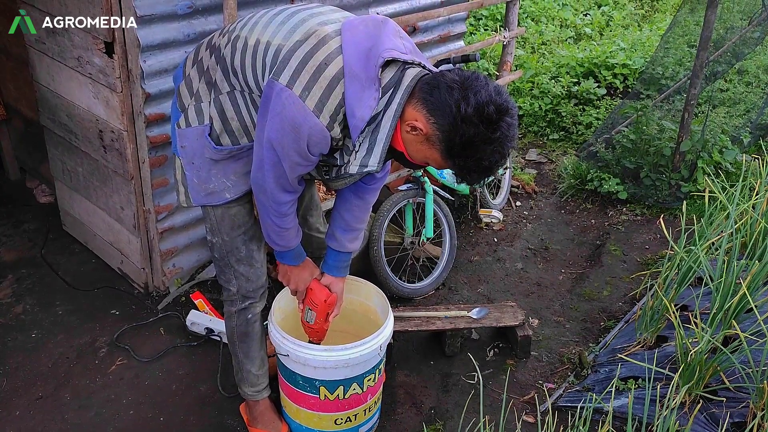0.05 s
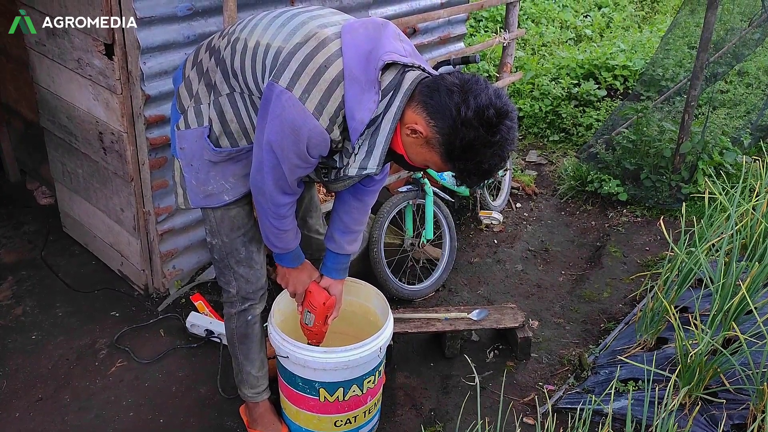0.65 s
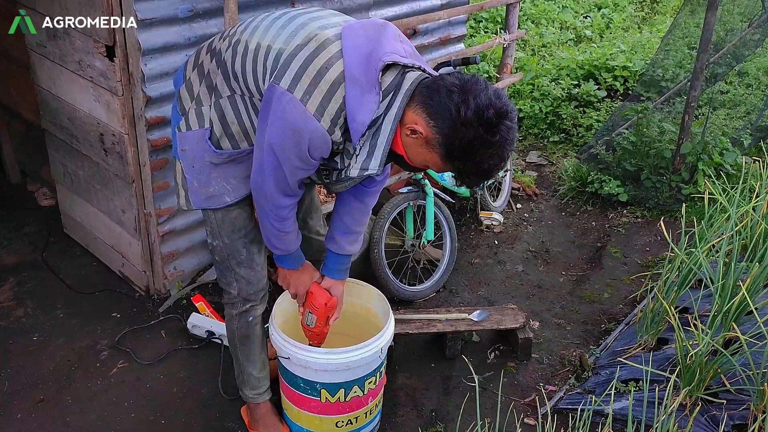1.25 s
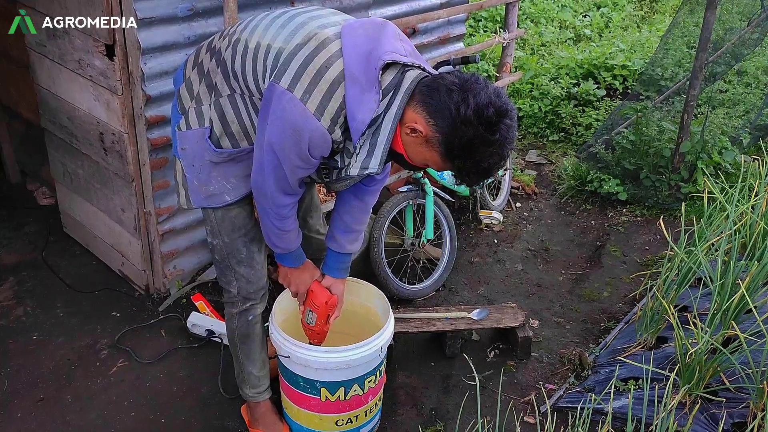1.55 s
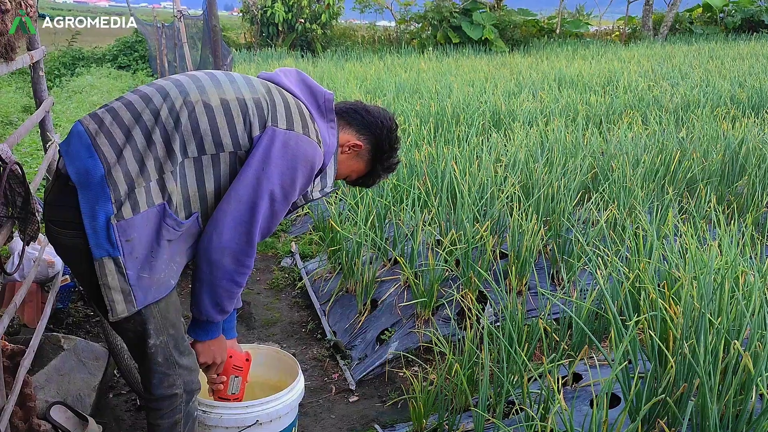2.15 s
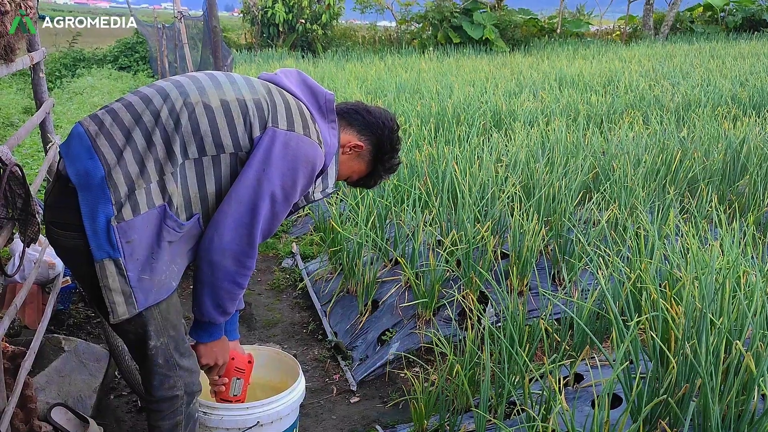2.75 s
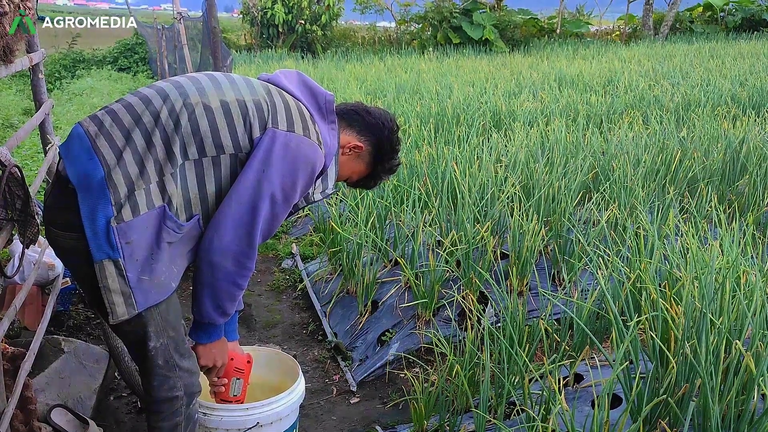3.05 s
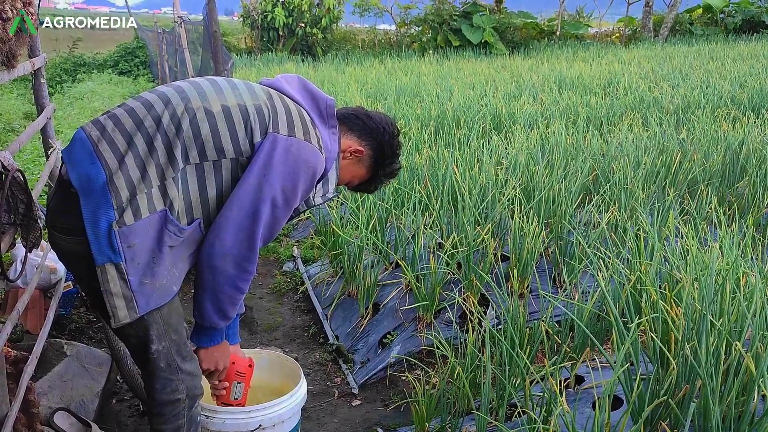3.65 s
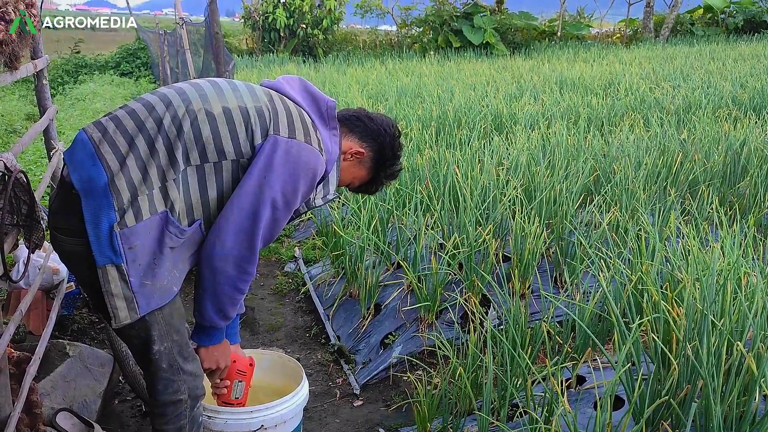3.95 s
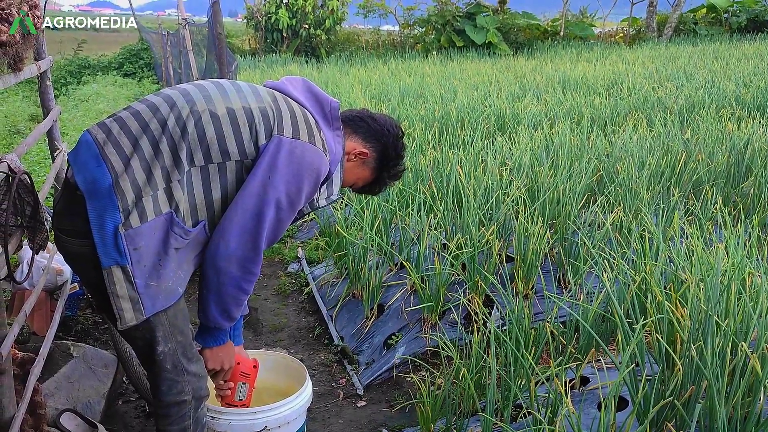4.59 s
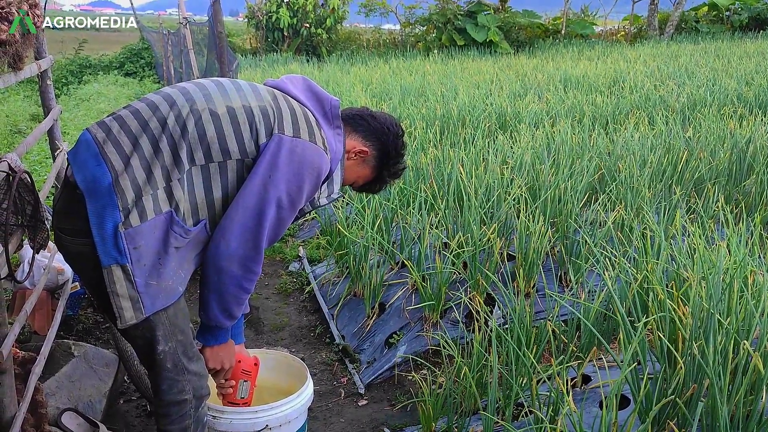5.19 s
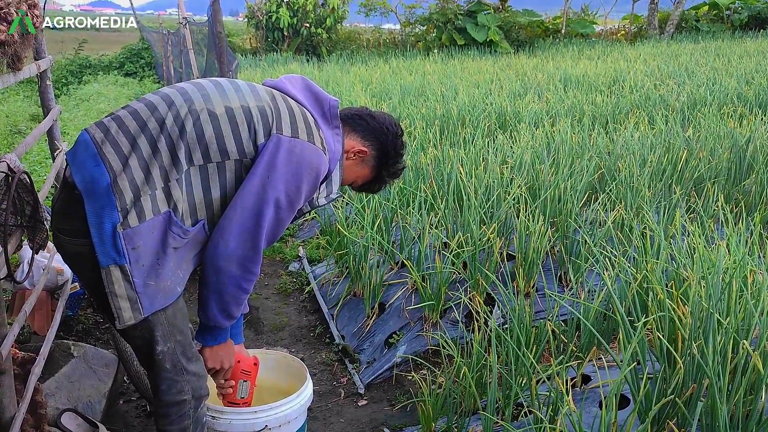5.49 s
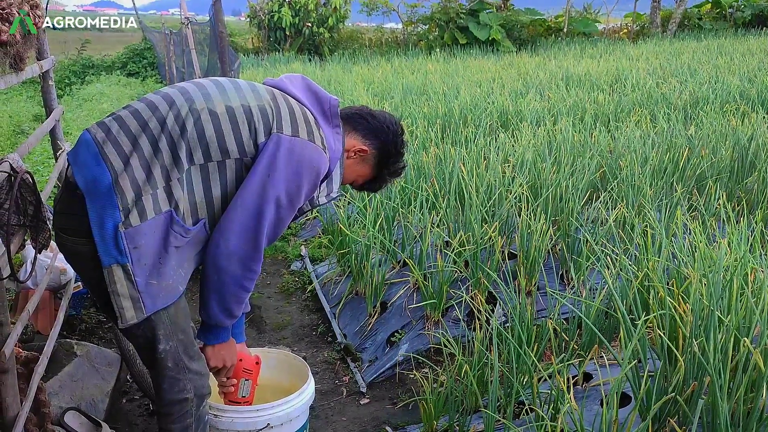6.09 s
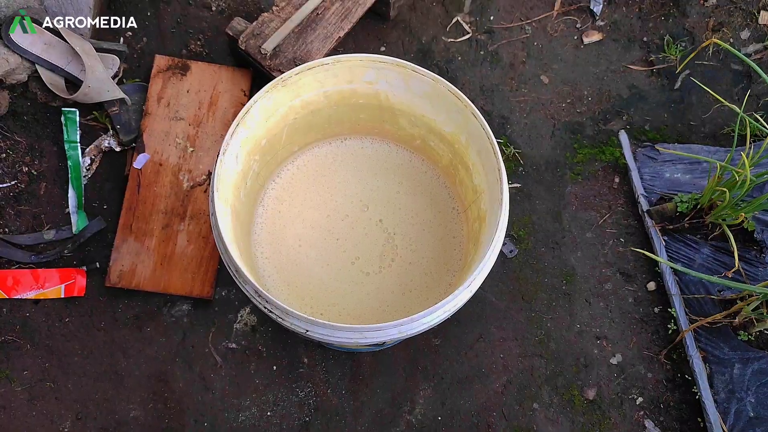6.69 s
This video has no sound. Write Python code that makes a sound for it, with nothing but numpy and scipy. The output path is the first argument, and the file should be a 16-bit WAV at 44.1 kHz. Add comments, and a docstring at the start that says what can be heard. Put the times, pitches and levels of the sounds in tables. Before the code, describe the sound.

Outdoors, an electric drill stirs liquid in a plastic bucket with a steady whine, rattling gears and soft paddle slaps, as wind buffets the microphone. The sound dips for an instant and returns from another angle, the speed drifting up and down while the bucket drones. Then the drill stops abruptly, and only rustling cloth, light wind and a distant hum with a few soft throbs remain.

```python
"""A corded drill whines and rattles close by, its paddle slapping thick liquid in a plastic bucket.
Gear teeth click and ring the case on every turn, brushes and fan hiss, the rod makes the bucket drone,
and gusts rumble on the microphone. From 1.85 s the drill is heard from the side,
its speed sagging and recovering with the drag. At 6.4 s it is gone, leaving a rustle of clothes
and a far hum with a few soft low throbs."""
import sys
import numpy as np
from scipy import signal
from scipy.fft import rfft, irfft, next_fast_len
from scipy.io import wavfile

SR = 44100
rng = np.random.default_rng(int(sys.argv[2]) if len(sys.argv) > 2 else 0)


def int16_out(signal):
    """Quantize to a 16-bit WAV file."""
    q = np.round(np.clip(np.atleast_2d(signal).T, -1, 1) * 32767)
    wavfile.write(sys.argv[1], SR, q.astype(np.int16))


N = 301195
TIME = np.arange(N) / SR
FREQS = np.maximum(np.arange(N // 2 + 1) * SR / N, 1)

GEAR_TEETH, PINION_TEETH = 47, 6
STEADY_SPEED_HZ = 36.985  # spindle turns per second under even drag
# when each place is heard: start_s, fade_in_s, end_s
NEAR_SPAN, FAR_SPAN, AFTER_SPAN = (-0.01, 0.002, 1.820), (1.852, 0.27, 6.357), (6.395, 0.52, 7.5)
# balance of the drill: rattle_db, whine_db, ring_db, motor_db
NEAR_MIX, FAR_MIX = (-29, 3, 0, -0.5), (-31, 2, -1.5, -2.5)
# spindle speeds at which the gear case sings: centre_hz, half_width_hz
SINGING, LOW_SINGING = (37.6, 0.95), (36.55, .2)

# spindle speed under changing drag: time_s, speed_hz
FAR_SPINDLE_SPEED = [(1.86, 37.313), (2.065, 36.659), (2.417, 36.432), (2.779, 37.403), (3.462, 38.243),
                     (4.369, 38.406), (4.813, 38.258), (5.211, 36.549), (5.603, 35.822), (6.104, 35.539),
                     (6.36, 37.176)]
# gear whine, clustered round the tooth rate: spindle_multiple, level_db
NEAR_MESH_TONES = [(46, -38), (47, -44.5), (48, -40.5), (50, -47.5), (51, -45.5), (52, -49), (57, -51)]
FAR_MESH_TONES = [(46, -48), (47, -38), (48, -53), (52, -53), (53, -55), (55, -56), (56, -53)]
# tight spots of the gear, slack where negative: place_turns, width_turns, load_db
NEAR_TIGHT_SPOTS = [(.11, 0.085, 10), (.375, 0.027, 11), (.59, 0.06, 6), (0.88, 0.049, 3)]
FAR_TIGHT_SPOTS = [(.09, 0.031, -1), (.265, 0.021, 9), (.48, 0.074, 6.5), (.67, 0.03, 1.5),
                   (0.88, 0.035, -4)]
# how deeply each band pulses with the load, the steady fan masking the rest: low_hz, high_hz, depth_ratio
PULSING_BANDS = [(30, 1600, .45), (1600, 2800, .85), (2800, 4200, .8), (4200, 16000, .6)]
# spectrum of the rattle: frequency_hz, gain_db
NEAR_RATTLE_SPECTRUM = [(90, -26.5), (180, -17), (260, -2), (450, -8), (700, -0.5), (1100, 1.5), (2000, -2),
                        (3400, 4.5), (5000, -5.5), (7000, -11.5), (10000, -20.5), (12000, -28.5),
                        (14000, -29)]
FAR_RATTLE_SPECTRUM = [(90, -14.5), (180, -17), (300, -9.5), (450, -10.5), (700, -4), (1100, -1.5),
                       (2000, -2.5), (2800, -3.5), (3400, -0.5), (4200, -4.5), (5000, -11), (7000, -18.5),
                       (10000, -24.5), (12000, -33), (14000, -35)]
# stereo width of the rattle: frequency_hz, side_minus_mid_db
SIDE_SPECTRUM = [(100, -72.5), (3850, -67.5), (4200, -50), (5000, -53), (5800, -28), (7000, -13.5),
                 (8500, -6), (14000, -6.5)]
# peaks and dips of housing and bucket: centre_hz, width_hz, gain_db
NEAR_RESONANCES = [(723.5, 42, 8.5), (912, 100, -5), (1090, 320, 6.5), (1794, 320, 5), (2750, 230, -3.5),
                   (3770, 550, 3.5), (4720, 580, 3.5), (5460, 400, -6), (8750, 240, 7.5)]
FAR_RESONANCES = [(394, 70, -6), (748, 82, 4.5), (999, 93, 5.5), (1500, 160, 4), (1670, 180, -3),
                  (2025, 36, 7.5), (2577, 95, 5), (2740, 110, -2), (3090, 240, 4.5), (3720, 195, 1),
                  (4520, 140, 0), (5150, 100, 7), (6010, 103, 6.5), (6555, 350, -6.5), (6734, 330, 11)]
# resonances that shift in strength with spindle speed: centre_hz, width_hz, gain_db, rise_db_per_hz
SHIFTING_RESONANCES = [(2014, 90, 0.5, -0.9), (3100, 260, -0.5, -0.9), (4050, 450, 0, 1.0),
                       (6000, 260, -1, 1.4), (6900, 200, 0.5, -0.8), (9400, 900, 1, 0.4),
                       (10900, 450, 2, 1.0)]
# ringing knocks of worn teeth: place_turns, spindle_multiple, width_s, peak_db
NEAR_WORN_TEETH = [(.1112, 94.4, .0015, -22.7), (.3696, 93.2, .002, -22.3), (.506, 94.2, .0006, -20.5),
                   (.5837, 95.1, .002, -20.8), (.8771, 95.5, .002, -27)]
FAR_WORN_TEETH = [(.0886, 91, .0012, -32), (.2471, 96, .0007, -29), (.4918, 94, .0007, -28),
                  (.6719, 93, .0007, -22.5)]
SINGING_TOOTH = [(.4812, 94.3, .0023, -26)]
LOW_SINGING_TOOTH = [(.5, 85.5, .002, -29)]
# armature and fan tones: motor_multiple, level_db
NEAR_MOTOR_TONES = [(3, -47.5), (4, -46.5), (5, -48.5), (11, -49.5), (16, -45.5), (24, -55.5)]
FAR_MOTOR_TONES = [(3, -56), (4, -46), (5, -55), (7, -56), (11, -53)]
# wobble of the stirring rod: spindle_multiple, level_db
NEAR_ROD_TONES = [(2, -59), (3, -61), (4, -55), (6, -58), (7, -61), (8, -60)]
FAR_ROD_TONES = [(2, -58), (3, -56), (5, -65), (6, -64), (7, -69.5), (8, -68), (9, -67), (10, -68.5)]
# the rod bears on the bucket: start_s, end_s, low_tones_db, high_tones_db
ROD_LEANS = [(0.32, 1.9, 0.5, 2), (2.099, 3, -4, 0), (3.05, 4.1, -4, -10), (3.5, 5.1, -1, 9.5),
             (5.15, 5.55, 2, 5.5), (5.949, 6.24, 2.5, -1)]
# dull scrape of the rod on the wall: frequency_hz, gain_db
SCRAPE_SPECTRUM = [(50, -7.5), (140, 10.5), (220, -11), (500, -18)]
# runs of paddle slaps, heard only within NEAR_SPAN: first_s, last_s, last_level_db
PADDLE_RUNS = [(.135, 0.45, -32), (.515, 0.56, -33), (.677, 0.93, -31), (1.19, 1.21, -34.5),
               (1.271, 1.4, -34.5), (1.488, 1.73, -38.5), (1.757, 2.5, -19.5)]
# gusts: peak_s, half_length_s, rise_db
WIND_GUSTS = [(0.17, 0.12, 2), (0.41, 0.14, 9), (0.732, 0.099, 4), (1.65, 0.17, 6.5), (5.235, 0.11, 6)]
# spectra of wind, of cloth and air, and of swish and ticks: frequency_hz, gain_db
WIND_SPECTRUM = [(5, 7), (12, -0.5), (22, -6), (35, -15), (60, -29.5), (120, -40), (300, -45), (1000, -100)]
RUSTLE_SPECTRUM = [(60, 18), (250, 13.5), (500, 4.5), (1100, 3), (2000, 0), (3500, -3), (6000, -7.5),
                   (10000, -11), (14000, -18)]
CRISP_SPECTRUM = [(400, -15), (1500, -3), (3200, 3), (12000, -22)]
# small dry ticks: start_s, level_db
DRY_TICKS = [(6.464, -68), (6.589, -67), (6.607, -67), (6.823, -69)]
# partials of the far hum: pitch_hz, level_db
HUM_PARTIALS = [(177.6, -69), (204.6, -71), (689, -85), (1061, -82)]
# soft low throbs in the far hum: start_s, level_db, nominal_pitch_hz
HUM_THROBS = [(6.608, -56, 130), (6.709, -56, 200), (6.779, -41, 129)]


def drill_near(turns, speed):
    """Superposition at close range: strong ringing bursts from the gear case, with bucket and liquid."""
    rattle = housing_rattle(turns, NEAR_TIGHT_SPOTS, NEAR_RATTLE_SPECTRUM, NEAR_RESONANCES)
    whine = gear_whine(turns - NEAR_TIGHT_SPOTS[0][0], NEAR_MESH_TONES, backlash_teeth=.04)
    ring = case_ring(turns, speed, NEAR_WORN_TEETH, jitter_s=.00001)
    motor = motor_tones(turns, NEAR_MOTOR_TONES)
    machine = drill(NEAR_MIX, speed, rattle, whine, ring, motor, flutter_db=0.6)
    return machine + bucket_drone(turns, NEAR_ROD_TONES) + paddle_slaps()


def drill_far(turns, speed):
    """Resonance heard from the side: the gear ticks, and near its singing speeds one spot rings out."""
    rattle = housing_rattle(turns, FAR_TIGHT_SPOTS, FAR_RATTLE_SPECTRUM, FAR_RESONANCES)
    rattle = shifting_resonances(rattle, speed)
    whine = gear_whine(turns - SINGING_TOOTH[0][0], FAR_MESH_TONES, backlash_teeth=.025)
    whine = colour(whine, [(1, 0)], FAR_RESONANCES)
    ring = case_ring(turns, speed, FAR_WORN_TEETH, jitter_s=.000025)
    ring += case_response(speed, *SINGING) * case_ring(turns, speed, SINGING_TOOTH, jitter_s=.00001)
    ring += case_response(speed, *LOW_SINGING) * case_ring(turns, speed, LOW_SINGING_TOOTH, .00003)
    motor = motor_tones(turns, FAR_MOTOR_TONES)
    machine = drill(FAR_MIX, speed, rattle, whine, ring, motor, flutter_db=0.55)
    return machine + bucket_drone(turns, FAR_ROD_TONES)


def drill(mix, speed, rattle, whine, ring, motor, flutter_db):
    """Amplitude modulation: levels follow the speed, and the gear flutters as liquid tosses the rod."""
    rattle_db, whine_db, ring_db, motor_db = mix
    excess_hz = speed - STEADY_SPEED_HZ
    gear = from_db(rattle_db + 0.17 * excess_hz) * rattle
    gear += case_response(speed, *SINGING) * from_db(whine_db) * whine + from_db(ring_db) * ring
    flutter = rms_one(from_db(flutter_db * drift(66)))
    return flutter * gear + from_db(motor_db + 2.5 * excess_hz) * motor


def tooth_rattle(turns, spots, wear=0.71, spread_db=1.5, hiss_db=2.5):
    """Impact noise: each tooth clicks, partly alike on every turn, amid the hiss of brushes and fan."""
    tooth = np.floor(turns * GEAR_TEETH).astype(int)
    impacts = np.flatnonzero(np.diff(tooth)) + 1
    flaws = rng.standard_normal(GEAR_TEETH)[tooth[impacts] % GEAR_TEETH]
    chance = rms_one(rng.choice([-1, 1], N) * from_db(spread_db * rng.uniform(-0.39, 1, N)))
    clicks = np.zeros(N)
    clicks[impacts] = chance[impacts] + wear * flaws
    for lag in (13, 37, 59):  # each click scatters through the gear case for a few ms
        allpass = np.r_[-.6, np.zeros(lag), 1]
        clicks = signal.lfilter(allpass, allpass[::-1], clicks)
    rasp = rms_one(clicks) + from_db(hiss_db) * rng.standard_normal(N)
    load_db, out = tooth_load(turns, spots), 0
    for low_hz, high_hz, depth in PULSING_BANDS:
        band = shaped(rasp, (FREQS >= low_hz) & (FREQS < high_hz))
        out += band * rms_one(from_db(depth * load_db))
    return out


def tooth_load(turns, spots):
    """Periodic loading: the force on the teeth, in dB, swells at each tight spot of the gear."""
    load_db = 0
    for place, width, db in spots:
        offset = (turns - place + .5) % 1 - .5
        load_db += db * np.exp(-.5 * (offset / width) ** 2)
    return load_db


def housing_rattle(turns, spots, spectrum, resonances):
    """Source and filter: the housing colours the rattle; the two channels differ only in the treble."""
    mid, side = [rms_one(colour(tooth_rattle(turns, spots), spectrum, resonances)) for _ in range(2)]
    return mid + colour(side, SIDE_SPECTRUM) * [[1], [-1]]


def shifting_resonances(rattle, speed, grip_db=0.9, flicker_db=2.0):
    """Time-varying filter: housing resonances come and go with speed and grip, and flicker grittily."""
    out = rattle
    for hz, width, db, rise in SHIFTING_RESONANCES:
        bell = np.exp(-2 * ((FREQS - hz) / width) ** 2)
        band = np.array([shaped(channel, bell) for channel in rattle])
        gain_db = db + rise * (speed - STEADY_SPEED_HZ) + grip_db * drift(3.1) + flicker_db * drift(100)
        out = out + (from_db(gain_db) - 1) * band
    return out


def gear_whine(turns, mesh, backlash_teeth):
    """Phase modulation: backlash roughens the tones clustered round the tooth rate."""
    play_turns = backlash_teeth * drift(60) / GEAR_TEETH
    return shaft_tones(turns + play_turns, mesh, scatter=0.71, waver_db=0.8)


def case_ring(turns, speed, teeth, jitter_s, scatter_db=1.6):
    """Impact excitation: each worn tooth rings the case once a turn, at a pitch that follows speed."""
    out = np.zeros(N)
    for place, multiple, width_s, db in teeth:
        turn = np.floor(turns - place + .5)
        chance_per_turn = rng.standard_normal((int(turn[-1]) + 3, 2))
        strength, lateness = chance_per_turn[turn.astype(int) + 1].T
        age = (turns - place - turn) / speed - jitter_s * lateness
        burst = from_db(db + scatter_db * strength) * np.exp(-.5 * (age / width_s) ** 2)
        out += burst * np.sin(2 * np.pi * multiple * speed * age)
    return out


def case_response(speed, centre_hz, half_width_hz):
    """Resonance curve, 0 to 1: the gear case answers most strongly at one speed."""
    return 1 / (1 + ((speed - centre_hz) / half_width_hz) ** 2)


def motor_tones(turns, harmonics):
    """Gear reduction: armature and fan spin faster than the spindle by the ratio of the teeth."""
    return shaft_tones(turns * GEAR_TEETH / PINION_TEETH, harmonics, scatter=0.8, waver_db=1.4)


def shaft_tones(turns, harmonics, scatter, waver_db):
    """Interference: harmonics of a shaft, if little scattered in phase, add up to a beat each turn."""
    out = np.zeros(N)
    for multiple, db in harmonics:
        phase = 2 * np.pi * round(multiple) * turns + scatter * rng.uniform(-np.pi, np.pi)
        out += from_db(db + waver_db * drift(4.6)) * np.sqrt(2) * np.cos(phase)
    return out


def bucket_drone(turns, harmonics, attack_s=0.078, release_s=0.16, ease_db_per_s=2.5):
    """Forced vibration: the off-centre rod shakes and scrapes the bucket as it leans on the wall."""
    hum_gain = low_gain = high_gain = from_db(-35)  # the rod runs free
    for start, end, low_db, high_db in ROD_LEANS:
        contact = np.clip(np.minimum((TIME - start) / attack_s, 1 - (TIME - end) / release_s), 0, 1)
        pressure = contact * from_db(-ease_db_per_s * (TIME - start))
        hum_gain = np.maximum(hum_gain, contact)  # the twice-a-turn hum needs only contact
        low_gain = np.maximum(low_gain, from_db(low_db) * pressure)
        high_gain = np.maximum(high_gain, from_db(high_db) * pressure)
    hum = shaft_tones(turns, harmonics[:1], scatter=0.26, waver_db=2.0)
    low = shaft_tones(turns, [row for row in harmonics[1:] if row[0] <= 4], scatter=0.387, waver_db=2.0)
    high = shaft_tones(turns, [row for row in harmonics if row[0] > 4], scatter=0.66, waver_db=2.5)
    scrape = from_db(-59) * noise(SCRAPE_SPECTRUM)
    return hum_gain * hum + low_gain * (low + scrape) + high_gain * high


def paddle_slaps(growth_db=1, nominal_pitch_hz=444):
    """Periodic impact: in a run the paddle meets the liquid every second turn, harder each time."""
    gap_s = 2 / STEADY_SPEED_HZ
    slaps = [(last - k * gap_s, db - k * growth_db, nominal_pitch_hz)
             for first, last, db in PADDLE_RUNS for k in range(round((last - first) / gap_s) + 1)]
    return damped_tones(slaps, decay_s=0.0085)


def damped_tones(events, decay_s):
    """Damped oscillation: each event starts a decaying sine, a little off its nominal pitch."""
    age = TIME[:SR // 10]
    out = np.zeros(N + len(age))
    for start_s, db, hz in events:
        at = min(round(start_s * SR), N)
        tone = np.sin(2 * np.pi * hz * rng.uniform(0.94, 1.15) * age)
        out[at:at + len(age)] += from_db(db) * np.exp(-age / decay_s) * tone
    return out[:N]


def wind():
    """Turbulence on the microphone: a low, gusting rumble, strong in the first place, then slight."""
    breeze = from_db(-29.5) * heard(NEAR_SPAN) + from_db(-43.5) * heard(FAR_SPAN)
    breeze += from_db(-41) * heard(AFTER_SPAN)
    surge_db = sum(db * np.exp(-((TIME - s) / half_s) ** 2) for s, half_s, db in WIND_GUSTS)
    return breeze * from_db(surge_db) * noise(WIND_SPECTRUM)


def swish_and_ticks(swish_s=6.68, half_length_s=.03, tick_decay_s=0.0035):
    """Transients: one swish and a few dry ticks, all of the same bright noise."""
    swish = from_db(-67) * np.exp(-((TIME - swish_s) / half_length_s) ** 2)
    ticks = sum(from_db(db) * (TIME > s) * np.exp(-np.abs(TIME - s) / tick_decay_s)
                for s, db in DRY_TICKS)
    return (swish + ticks) * noise(CRISP_SPECTRUM)


def clothes_rustle(peak_s=6.69, rise_db_per_s=65, fall_db_per_s=15, air_db=-80):
    """Friction noise: cloth swells and eases over a faint, constant air hiss of the same colour."""
    below_peak_db = np.maximum(rise_db_per_s * (peak_s - TIME), fall_db_per_s * (TIME - peak_s))
    swell = from_db(-66 - below_peak_db) * (TIME > AFTER_SPAN[0])
    grains = rng.standard_normal(N) * from_db(1.5 * drift(120))
    return (swell + from_db(air_db)) * rms_one(colour(grains, RUSTLE_SPECTRUM))


def far_hum(waver_rad_per_hz=.001):
    """Random modulation: faint partials waver in phase and level, with a few soft low throbs."""
    hum = 0
    for hz, db in HUM_PARTIALS:
        amplitude = from_db(db + 2 * drift(9)) * np.sqrt(2)
        hum += amplitude * np.sin(2 * np.pi * hz * TIME + waver_rad_per_hz * hz * drift(12))
    return np.sqrt(heard(AFTER_SPAN)) * hum + damped_tones(HUM_THROBS, decay_s=0.003)


def heard(span, opening_share=0.12, edge_s=0.006):
    """Envelope of one place: a soft start, a fade up and a quick end."""
    start, fade, end = span
    edges = np.clip(np.minimum((TIME - start) / edge_s, (end - TIME) / edge_s + .5), 0, 1)
    return np.clip(opening_share + (TIME - start) / fade, 0, 1) * edges


def drift(corner_hz, hop=40):
    """Low-passed noise: a smooth random wander of rms 1."""
    pole = np.exp(-2 * np.pi * corner_hz * hop / SR)
    white = rng.standard_normal(N // hop + 2002)
    slow = signal.lfilter([1], [1, -2 * pole, pole * pole], white)[2000:]
    return np.interp(np.arange(N) / hop, np.arange(len(slow)), rms_one(slow))


def noise(spectrum):
    """Coloured noise of rms 1."""
    return rms_one(colour(rng.standard_normal(N), spectrum))


def colour(x, spectrum, resonances=()):
    """Spectral envelope: filter by a smooth curve with bell-shaped peaks and dips on it."""
    hz, db = np.transpose(spectrum)
    shape_db = np.interp(np.log(FREQS), np.log(hz), db)
    for centre, width, height in resonances:
        shape_db += height * np.exp(-2 * ((FREQS - centre) / width) ** 2)
    return shaped(x, from_db(shape_db))


def shaped(x, gain):
    """Zero-phase filtering by a gain given at every frequency."""
    size = next_fast_len(N)
    bins_hz = np.arange(size // 2 + 1) * SR / size
    return irfft(rfft(x, size) * np.interp(bins_hz, FREQS, gain), size)[:N]


def from_db(db):
    """Decibels to amplitude ratio."""
    return 10 ** (np.asarray(db) / 20)


def rms_one(x):
    """Normalise to rms 1."""
    return x / np.sqrt(np.mean(x ** 2) + 1e-20)


def scene():
    """Sources add linearly: the drill close by, then from the side, then the quiet yard, all in wind."""
    dragged_speed = np.interp(TIME, *np.transpose(FAR_SPINDLE_SPEED))
    speed = np.where(TIME < NEAR_SPAN[2], STEADY_SPEED_HZ, dragged_speed)
    turns = np.cumsum(speed * (1 + .0003 * drift(5))) / SR
    stirring = heard(NEAR_SPAN) * drill_near(turns, speed) + heard(FAR_SPAN) * drill_far(turns, speed)
    return stirring + wind() + far_hum() + clothes_rustle() + swish_and_ticks()


def record(dry):
    """Band limiting: a steep low-pass cuts the treble above 14.3 kHz."""
    return signal.sosfiltfilt(signal.ellip(10, .05, 70, 14300, fs=SR, output="sos"), dry)


dry = scene()
out = record(dry)
int16_out(out)
```